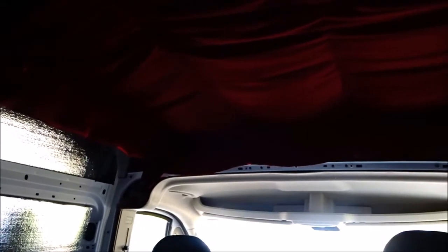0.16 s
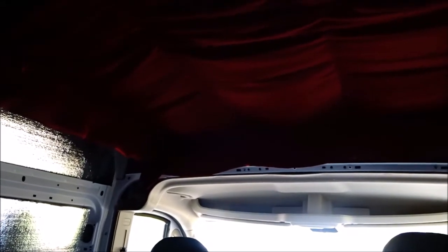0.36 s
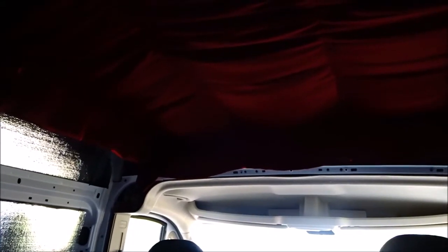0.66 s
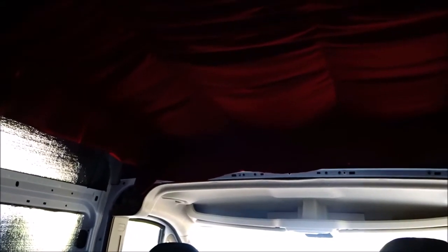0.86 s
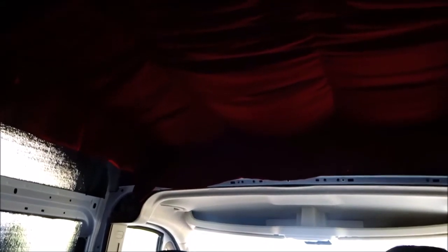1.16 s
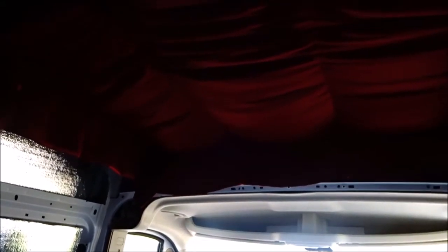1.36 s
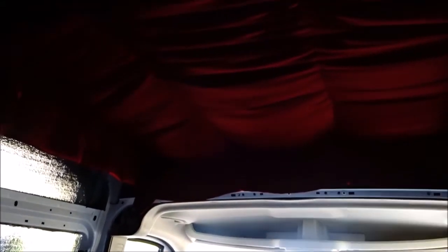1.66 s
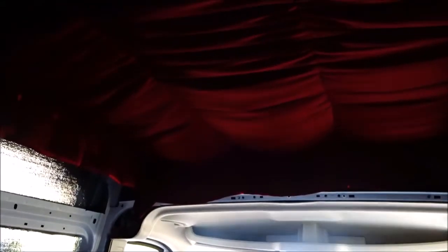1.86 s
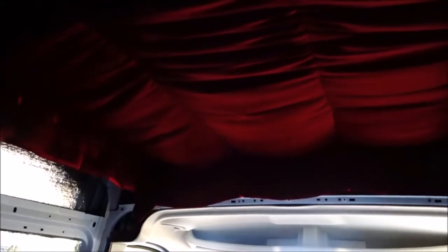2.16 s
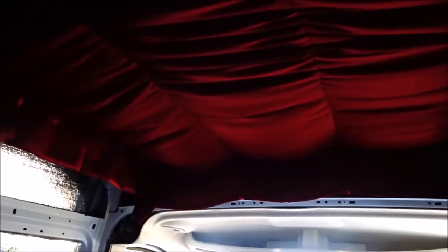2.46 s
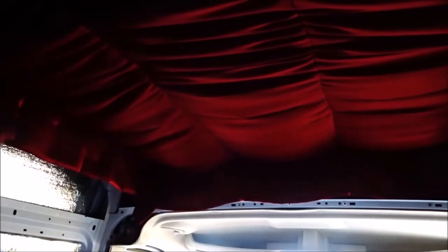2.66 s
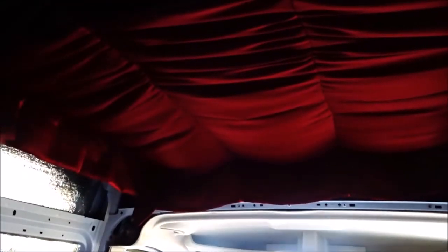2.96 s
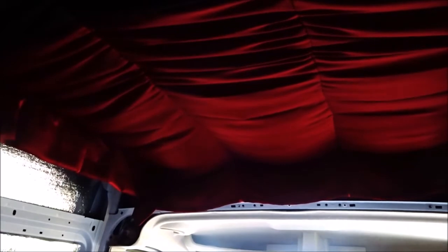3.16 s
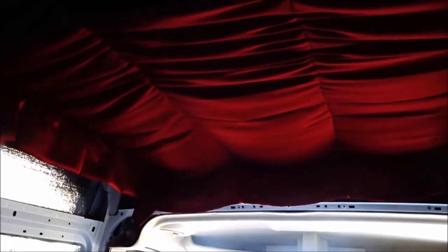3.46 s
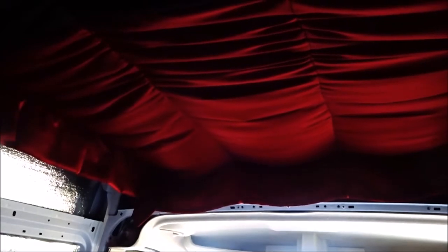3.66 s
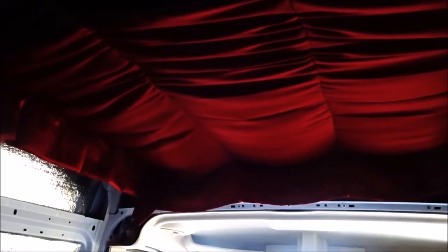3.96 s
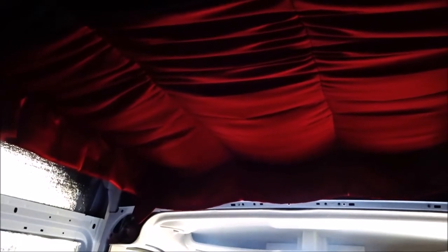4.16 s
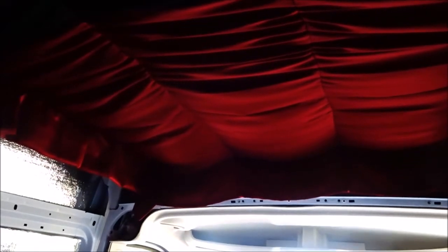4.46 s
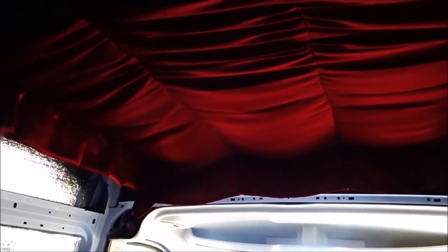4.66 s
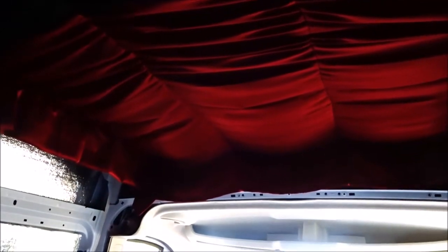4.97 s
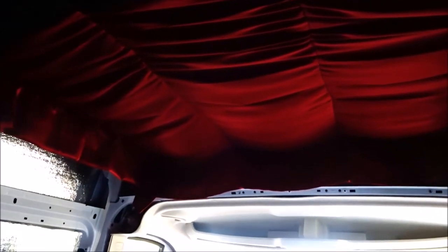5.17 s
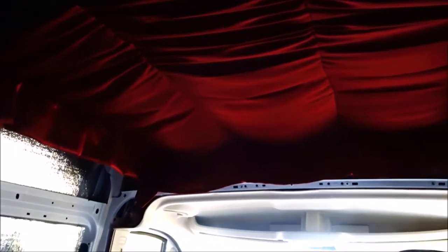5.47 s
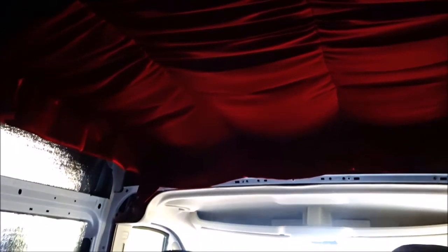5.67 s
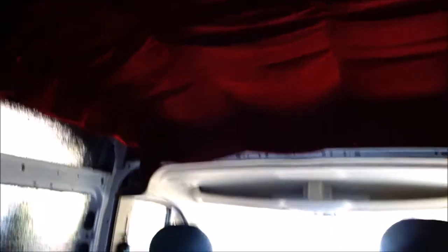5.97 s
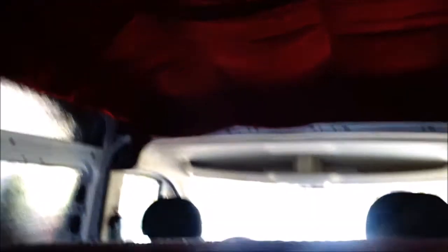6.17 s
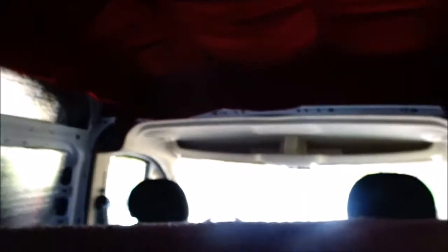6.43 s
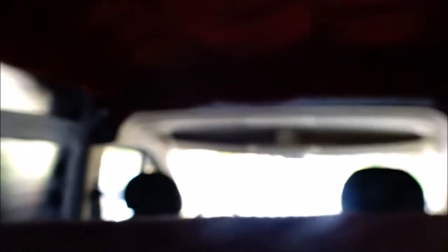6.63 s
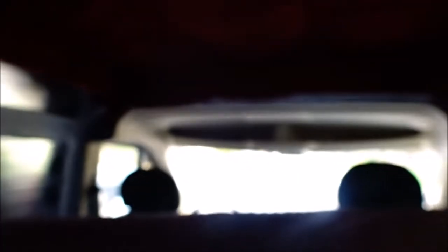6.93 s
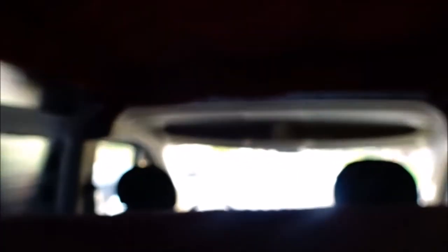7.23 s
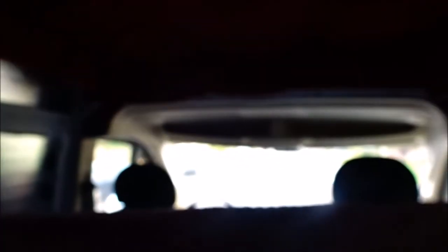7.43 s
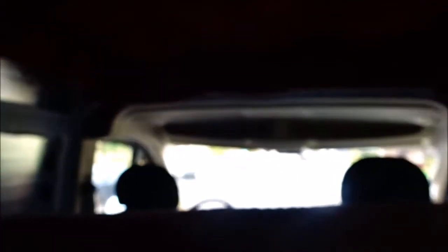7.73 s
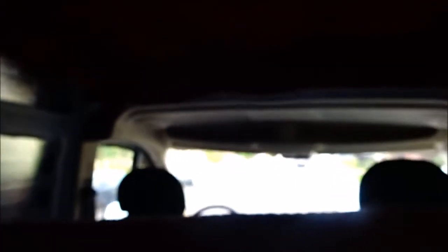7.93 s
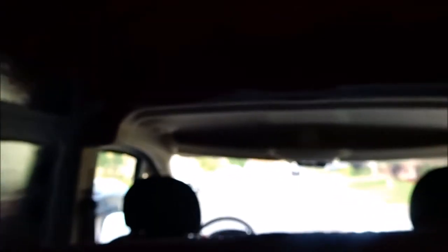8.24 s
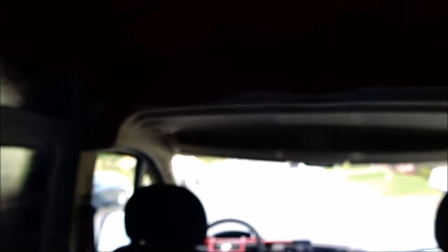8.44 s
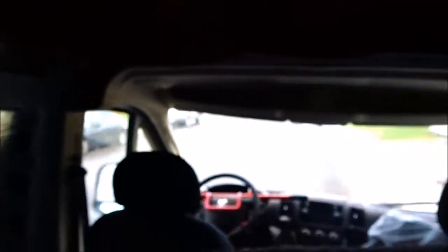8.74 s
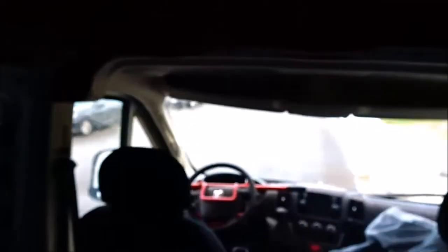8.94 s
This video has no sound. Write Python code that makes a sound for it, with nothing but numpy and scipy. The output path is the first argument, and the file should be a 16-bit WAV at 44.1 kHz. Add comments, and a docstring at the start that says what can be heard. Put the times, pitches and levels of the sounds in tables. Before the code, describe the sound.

From inside a parked van, raindrops tick and patter on the sheet-metal roof over an even hiss of finer rain.

```python
"""Rain on the sheet-metal roof of a parked van, heard from inside by a small two-port microphone.
Each big drop clicks and rings its panel, then its energy spreads through panel and cabin as a
diffuse wash that dies in about a quarter second. Close drops add sharp pitched ticks; countless
small ones merge into a hiss dotted with taps. Very faint low thumps lie far beneath the rain."""
import sys
import numpy as np
from scipy import signal
from scipy.fft import rfft, irfft, next_fast_len
from scipy.io import wavfile

SR = 44100
rng = np.random.default_rng(int(sys.argv[2]) if len(sys.argv) > 2 else 0)


def generate_wav(signal):
    """Clip the signal to [-1, 1] and save it as 16-bit WAV at the path in sys.argv[1]."""
    frames = np.transpose(np.atleast_2d(signal))
    scaled = np.clip(frames, -1, 1) * 32767
    pcm = np.round(scaled).astype(np.int16)
    wavfile.write(sys.argv[1], SR, pcm)


N = 401310
LEAD = SR // 4  # samples of pre-roll: the rain is already falling at the start

# Foreground hits: t/s, wash level/dB, boom/dB, splash/dB (low and high tone controls), panel note f/Hz
BIG_DROPS = [(0.0256, -28, -14, -15, 1080), (0.0394, -30.5, -9, -13, 847), (0.0524, -26.5, -10.5, -14, 697),
             (0.194, -29, -22, -14, 1170), (0.3018, -33, -9, -24, 925), (0.3202, -22.5, -12, -18, 963),
             (0.625, -35.5, -3.5, -32, 944), (0.7517, -31.5, -13, -17, 830), (0.8025, -29, -10, -18, 1064),
             (0.9744, -30.5, -11, -18, 1200), (1.112, -31, -13, -18, 940), (1.14, -48, -3, -26, 900),
             (1.2855, -32, -8, -18, 885), (1.328, -32.5, -15, -12, 920), (1.36, -28, -11, -17, 874),
             (1.3728, -23, -15.5, -8, 1010), (1.3846, -21.5, -11.5, -24, 1036), (1.401, -31, -10, -12, 904),
             (1.4434, -23.5, -13, -12, 880), (1.538, -35.5, -6, -8, 910),
             (1.5623, -27.5, -10.5, -10.5, 700), (1.7115, -30, -15, -8, 1004), (1.7234, -30, -16, -11, 813),
             (1.7684, -29, -8.5, -18, 777), (1.8326, -26.5, -12, -15, 680), (1.9355, -44, -18, -25, 865),
             (2.018, -32, -11, -12, 918), (2.0762, -26.5, -14.5, -10.5, 810),
             (2.1294, -29, -10.5, -17, 810), (2.145, -33, -12, -20, 900), (2.2245, -28.5, -12, -18, 940),
             (2.271, -31.5, -11, -11, 892), (2.3043, -30, -13, -7, 1040), (2.3184, -30, -12, -13, 760),
             (2.379, -30.5, -12, -11.5, 947), (2.42, -40, -1, -17, 900), (2.5528, -28.5, -7.5, -16, 820),
             (2.638, -32, -25, -17, 895), (2.7132, -25.5, -13.5, -10, 1290), (2.7374, -27, -15, -22, 810),
             (2.817, -31, -19, -18, 900), (2.8245, -29.5, -10, -17, 710), (3.0364, -37, -4, -9, 950),
             (3.1314, -24, -21, -16, 870), (3.1522, -26.5, -8, -18, 970), (3.212, -35, -21, -19, 920),
             (3.2297, -27.5, -20, -12, 1140), (3.316, -30.5, -15, -17, 900), (3.395, -39, -12, -18, 915),
             (3.4815, -29, -11.5, -20, 884), (3.5618, -28, -26, -14, 800), (3.5982, -29, -13, -15, 813),
             (3.641, -33.5, -7.5, -10, 923), (3.664, -33, -22, -16, 900), (3.6844, -27.5, -6, -10, 800),
             (3.6968, -30, -2.5, -12, 790), (3.7008, -24, -19, -12, 984), (3.845, -31.5, -14, -17, 924),
             (3.9193, -25.5, -10.5, -14.5, 872), (3.9632, -29, -8, -18, 955), (4.0044, -28, -6, -14, 697),
             (4.0234, -29.5, -5, -15, 773), (4.115, -26, -12, -15, 700), (4.122, -33, -4, -19, 900),
             (4.1288, -34.5, -3.5, -17, 937), (4.1644, -32.5, -1, -17, 781), (4.2108, -27, -9, -14, 794),
             (4.294, -31, -18, -14, 905), (4.3134, -34.5, -7, -9, 696), (4.3331, -25, -10, -21, 888),
             (4.4293, -34, -7.5, -16, 707), (4.4927, -26, -2.5, -17, 819), (4.5074, -29, -14, -18, 830),
             (4.5294, -28, -7, -10.5, 785), (4.5584, -27, -10, -17, 820), (4.6364, -32, -6, -15, 922),
             (4.6604, -32, -8, -12, 910), (4.6752, -27.5, -10, -15, 1170), (4.7814, -29, -23, -15, 796),
             (4.798, -31, -17, -13, 935), (4.8314, -29, -10, -12, 845), (4.8454, -26.5, -11.5, -11, 860),
             (4.9275, -31.5, -2.5, -12, 967), (5.0014, -31.5, -12, -17, 897), (5.081, -31, -23, -9.5, 1110),
             (5.214, -28.5, -14, -18, 1180), (5.228, -26.5, -13, -16, 974), (5.2685, -32, -16, -15, 980),
             (5.285, -30, -14, -15, 890), (5.3103, -33.5, -7.5, -13, 1004),
             (5.3468, -29.5, -9.5, -13, 1010), (5.397, -39, -6, -9, 900), (5.438, -32, -13, -8.5, 880),
             (5.4804, -28.5, -22, -13, 830), (5.525, -32.5, -9.5, -4, 1187), (5.5754, -27, -11.5, -12, 925),
             (5.61, -40, -8, -19, 920), (5.676, -31.5, -11.5, -16, 936), (5.712, -29, -16, -16, 910),
             (5.7773, -25.5, -9, -13, 811), (5.7904, -24, -17, -12, 814), (5.8531, -22, -13.5, -7.5, 787),
             (5.8658, -27, -7.5, -29, 967), (5.9895, -27.5, -12.5, -13, 805), (6.0764, -30, -7, -14, 950),
             (6.1016, -30.5, -26, -20, 910), (6.164, -30, -23, -10.5, 890), (6.1774, -29, -16, -15, 980),
             (6.3061, -32.5, -29, -13, 915), (6.3936, -20, -14, -13, 732), (6.525, -50, -12, -12, 910),
             (6.567, -28, -11, -11.5, 805), (6.612, -45, -21, -7, 900), (6.7146, -24, -12, -16.5, 668),
             (6.8483, -29.5, -14, -13, 712), (6.8833, -35, -6.5, -10, 1030), (6.9321, -32, -17, -15, 947),
             (7.018, -32, -10, -19, 1003), (7.065, -35, -9, -15, 907), (7.123, -36, -25, -14, 875),
             (7.19, -35, -11, -13, 920), (7.219, -24, -11.5, -18.5, 642), (7.2599, -31.5, -12, -16, 760),
             (7.305, -37, -11, -22, 908), (7.3781, -29.5, -11, -25, 748), (7.414, -33, -23, -14, 935),
             (7.4532, -32, -10, -11, 823), (7.459, -29.5, -7, -14, 807), (7.4694, -32.5, -20, -9, 860),
             (7.5457, -27.5, -11, -17, 658), (7.739, -33.5, -16, -15, 910), (7.7895, -27, -10, -18, 924),
             (7.824, -27.5, -16, -18, 945), (7.8684, -28.5, -20, -19, 780), (7.9423, -25.5, -8.5, -14, 796),
             (7.9724, -22.5, -14.5, -20, 798), (7.9904, -28.5, -8, -16, 670),
             (8.0551, -27.5, -15, -15, 775), (8.0815, -25.5, -18, -17, 674),
             (8.1339, -26, -15.5, -8.5, 964), (8.1738, -28.5, -9, -14, 748), (8.211, -37, -18, -7, 880),
             (8.2397, -25.5, -11.5, -14, 712), (8.3628, -25.5, -11.5, -15, 748),
             (8.3884, -29.5, -20, -20, 845), (8.4264, -35, -5, -3, 814), (8.4392, -26.5, -14, -17, 1010),
             (8.535, -35, -16, -21, 890), (8.6637, -30.5, -9.5, -21, 934), (8.756, -23.5, -14.5, -17, 950),
             (8.7874, -22.5, -19, -21, 880), (8.8084, -25.5, -10.5, -19, 837), (8.905, -37, -17, -27, 870),
             (8.989, -31, -15, -20, 1003), (9.0064, -29, -21, -16, 760), (9.0174, -23, -11.5, -15, 790)]
def contact_clicks(big):
    """The attack of each big drop: twelve pitches struck together, and one echo across the cabin."""
    hits = np.repeat(big, 12, axis=0)
    draw = rng.random((len(hits), 2))
    slot = np.arange(len(hits)) % 12
    hz = 800 * 13 ** ((slot + draw[:, 0]) / 12)
    tilt_db = 4 * np.log2(hz / 2000)  # brighter by 4 dB an octave
    db = drop_level_db(hz, hits) + curve(ROOF_EQ, hz) + 1 + tilt_db + 8 * (draw[:, 1] - .5)
    onset, t60 = hits[:, 0], 0.0036 + 6.3 / hz
    click = rings(onset, hz, db, t60, rise=0.00038, size=900)
    echo = rings(onset + 0.0135, hz, db - 7, 2 * t60, rise=0.0013, size=900)
    return low_cut(click + echo, 620, slope=6)


def panel_notes(big):
    """The body of each big drop: a cluster of close low panel modes and a few brief higher ones."""
    onset, low_hz, wash_db, boom_db = np.repeat(big[:, [0, 4, 1, 2]], 3, axis=0).T
    detune, uneven, pitch = rng.standard_normal((len(onset), 3)).T
    low_db = wash_db + boom_db - 6.5 + 3 * uneven
    low = rings(onset, low_hz * (1 + 0.04 * detune), low_db, t60=0.14, rise=0.0037, size=4000)
    high_hz = 2600 * 2.8 ** np.tanh(pitch)
    high_db = wash_db + curve(ROOF_EQ, high_hz) - 4.5
    high = rings(onset, high_hz, high_db, t60=0.038, rise=0.00079, size=2500)
    return low_cut(low + high, 560, slope=6)  # the notes carry no bass


# Tone of roof, lining and microphone together: f/Hz, relative level/dB
ROOF_EQ = [(15, -78), (25, -24), (158, -37), (220, -34.5), (299, -23.5), (511, -15), (690, -8), (811, -7.5),
           (980, -7.5), (1130, -11), (1840, -8), (2200, -9.5), (3500, -12.5), (4300, -13), (4900, -19),
           (5500, -18.5), (6000, -21), (6600, -20.5), (7300, -25.5), (8000, -26), (8700, -25), (10000, -26),
           (12000, -29.5)]
# Envelope of the wash across the spectrum: f/Hz, t60/s, build-up/s, early burst level/dB
WASH_ENVELOPE = [(150, 0.092, 0.025, -13), (400, 0.15, 0.016, -3), (700, 0.28, 0.02, -9),
                 (1930, 0.2, 0.0074, -16), (4640, 0.14, 0.0065, 0), (9800, 0.18, 0.002, -3.5)]
# Stereo image of the wash: f/Hz, left-right correlation (1 is mono)
WASH_IMAGE = [(60, 0.95), (130, 0.89), (270, 0.85), (560, 0.96), (1190, 0.84), (2520, 0.76), (5320, 0.041),
              (11200, -0.34)]
def roof_wash(drops, scatter_db):
    """The tail: drops feed the dense modes of panel and cabin; each band swells and dies at its pace."""
    bands_hz = 200 * 2 ** (np.arange(15) * 2 / 5)
    size = next_fast_len(N)
    hz = np.fft.rfftfreq(size, 1 / SR)
    noise = rfft(rng.standard_normal((2, size))) * amp(curve(ROOF_EQ, hz))
    uneven_db = scatter_db[:, None] * rng.standard_normal((len(drops), len(bands_hz)))
    arrival = ((drops[:, 0] + 0.0004) * SR + LEAD).astype(int)  # just after the contact
    wash = np.zeros((2, N))
    for k, centre in enumerate(bands_hz):
        t60, build_up, early_db = (curve(WASH_ENVELOPE, centre, column) for column in (1, 2, 3))
        power = amp(2 * (drop_level_db(centre, drops) + uneven_db[:, k] / 2))
        blows = np.bincount(arrival, power, N + LEAD)
        pole = np.exp(-1 / (SR * build_up))
        tail = signal.lfilter([1 - pole], [1, -pole], decay(blows, t60))
        early = amp(early_db) ** 2 * decay(blows, t60=0.041)  # before the energy has spread
        crack = amp(-7) ** 2 * decay(blows, t60=0.007)  # the drop bursting
        envelope = np.sqrt((tail + early + crack)[LEAD:N + LEAD])
        crossfade = curve(np.c_[bands_hz, bands_hz == centre], hz)
        wash += envelope * irfft(noise * crossfade, size)[:, :N]
    width = lambda f: np.arccos(curve(WASH_IMAGE, f)) / 2
    mid, side = filtered(amp(7) * wash, lambda f: np.array([np.cos(width(f)), np.sin(width(f))]))
    return np.array([mid + side, mid - side])


# Bright accents from drops landing close by: t/s, centre f/Hz, level/dB
CLOSE_TICKS = [(0.3225, 4050, -28), (2.0755, 4730, -36), (3.143, 1900, -28), (3.6855, 4200, -26),
               (4.1152, 9200, -33.5), (4.211, 2580, -26), (5.7775, 4140, -38), (6.5682, 3140, -28),
               (7.4145, 4000, -36), (7.4535, 3020, -30), (7.55, 1580, -23), (8.1375, 5460, -30),
               (8.364, 4240, -26), (8.442, 4320, -42), (0.8586, 4280, -29.5), (1.2861, 1850, -25),
               (1.2865, 3590, -30), (1.3749, 4140, -24), (1.4028, 5770, -26), (1.7685, 2220, -24),
               (1.8328, 3100, -23), (2.553, 1930, -27), (2.7135, 8460, -29.5), (2.88, 6050, -32),
               (3.1527, 5930, -29), (3.158, 1150, -25.5), (3.7011, 4180, -20), (3.563, 3800, -35),
               (3.922, 2360, -35), (4.4945, 4200, -25), (5.082, 6250, -30), (5.1647, 4070, -28),
               (5.348, 1740, -25), (5.4815, 5540, -28), (5.5264, 8140, -32), (5.791, 5670, -20.5),
               (5.8537, 6250, -25), (6.0776, 5050, -27), (6.307, 1880, -27), (6.3938, 6370, -23),
               (6.726, 1750, -31), (6.8494, 4200, -26), (6.884, 2940, -26), (7.2605, 2200, -26),
               (7.7914, 2550, -24), (7.877, 3830, -29), (7.9434, 6720, -34), (8.1755, 4300, -24.5),
               (8.3685, 4400, -28), (8.52, 4000, -30), (8.606, 4060, -33), (8.7565, 2050, -25),
               (9.0185, 3240, -24), (9.019, 9400, -30)]
def close_ticks():
    """Direct sound: the metal under a drop snaps on seven scattered pitches, then shimmers out."""
    onset, hz, db = np.repeat(CLOSE_TICKS, 7, axis=0).T
    draw = rng.random((len(onset), 4))
    snap_hz = hz * (1 + 0.33 * (draw[:, 1] - .5))
    snap = rings(onset + 0.0012 * draw[:, 0], snap_hz, db - 7, t60=0.0079, rise=0.00058, size=800)
    shimmer_hz = hz * (1 + 0.299 * (draw[:, 3] - .5))
    shimmer = rings(onset + 0.012 * draw[:, 2], shimmer_hz, db - 13.5, t60=0.027, rise=0.002, size=2000)
    return snap + shimmer


# Level ride of the rain bed: t/s, wash level of the faintest drops/dB
SHOWER_RIDE = [(0.0, -45), (1.11, -47.5), (1.98, -44), (2.3, -46), (2.5, -46.5), (2.69, -49), (2.9, -45.5),
               (3.3, -45.5), (3.88, -48.5), (4.38, -43.5), (5.0, -45.5), (5.5, -47), (6.11, -44.5),
               (6.51, -48.5), (6.69, -49.5), (7.0, -47), (7.65, -46.5), (8.24, -46), (8.51, -47),
               (9.1, -48)]
def small_drops():
    """Random hits in the columns of BIG_DROPS, about 330 a second: most faint, a few stronger."""
    draw = rng.random((3100, 5))
    onset = (draw[:, 0] * (N + LEAD) - LEAD) / SR
    wash_db = np.interp(onset, *np.transpose(SHOWER_RIDE)) - 2.5 * np.log(draw[:, 1]).clip(-3.5)
    boom_db = -11 + 6 * (draw[:, 2] - .5)
    splash_db = -15 + 6 * (draw[:, 3] - .5)
    return np.array([onset, wash_db, boom_db, splash_db, 620 * 1.8 ** draw[:, 4]]).T


def small_taps(small):
    """One small drop in four rings a single roof mode long enough to be heard as a tap."""
    onset, wash_db = small[::4, :2].T
    pitch, strength = rng.random((len(onset), 2)).T
    hz = 750 * 13 ** pitch
    db = wash_db + curve(ROOF_EQ, hz) + 2.5 - 3 * np.log(strength).clip(-3)
    return rings(onset, hz, db, t60=0.099 * (1000 / hz) ** 0.48, rise=0.0012, size=2600)


def faint_ticks(small):
    """Fine grain: the metal under each small drop rings for a moment at a random high pitch."""
    hz = 1500 * 6.64 ** rng.random(len(small))
    db = small[:, 1] + curve(ROOF_EQ, hz) + rng.normal(9.0, 3.4, len(small))
    return rings(small[:, 0], hz, db, t60=25 / hz, rise=0.00059, size=500)


# Low-end accents far beneath the rain: t/s, level/dB
LOW_THUMPS = [(0.8, -80), (1.28, -82), (2.07, -85), (2.555, -81), (2.685, -81), (4.2, -64), (4.495, -77),
              (5.345, -78), (5.775, -83), (5.86, -72), (6.375, -72), (6.562, -82), (6.7, -80), (7.45, -71),
              (7.942, -67), (8.062, -69), (8.355, -79), (9.005, -74)]
def low_thumps():
    """Very faint, short low thumps near 70 Hz; fifty still fainter ones come at random."""
    onset, db = np.transpose(LOW_THUMPS)
    draw = rng.random((50, 2))
    onset = np.r_[onset, draw[:, 0] * N / SR]
    db = np.r_[db, -94 + 8 * draw[:, 1]]
    hz = 70.5 * 1.6 ** (rng.random(len(onset)) - .5)
    pan = amp([[-0.8], [0.8]])  # slightly right
    return pan * rings(onset, hz, db, t60=0.086, rise=0.0028, size=4000)


def drop_level_db(hz, drops):
    """Each drop's level at hz: a boom of -10.5 dB and a splash of -16 dB leave its tone flat."""
    low = np.clip(np.log2(1700 / hz) / 1.2, 0, 1)
    high = np.clip(np.log2(hz / 3500) / 1.24, 0, 1)
    return drops[:, 1] + low * (drops[:, 2] + 10.5) + high * (drops[:, 3] + 16)


def rings(onset, hz, db, t60, rise, size):
    """Damped sines, size samples long, that reach the two ports a moment apart; times in seconds."""
    onset, hz, db, t60 = (np.reshape(c, (-1, 1)) for c in (onset, hz, db, t60))
    lag = 7e-5 * (rng.random(onset.shape) - .5)
    where = ((onset * SR).astype(int) + np.arange(size)).ravel()
    ports = []
    for port in (1, -1):
        t = (np.arange(size) / SR - 1e-4 + port * lag).clip(0)
        envelope = amp(db - 60 * t / t60) * (1 - np.exp(-t / rise))
        ring = envelope * np.sin(2 * np.pi * hz * t)
        ports.append(np.bincount(where, ring.ravel(), N + size)[:N])
    return np.array(ports)


def decay(energy, t60):
    """Gives energy impulses an exponential tail."""
    return signal.lfilter([1], [1, -amp(-120 / (SR * t60))], energy)


def amp(db):
    """Decibels to gain."""
    return 10 ** (np.asarray(db) / 20)


def curve(table, hz, column=1):
    """One column of a table read on a log-frequency axis."""
    columns = np.transpose(table)
    return np.interp(np.log(hz + 1), np.log(columns[0] + 1), columns[column])


def filtered(x, response):
    """Zero-phase EQ with gain response(hz)."""
    size = next_fast_len(N + 8192)
    return irfft(rfft(x, size) * response(np.fft.rfftfreq(size, 1 / SR)), size)[..., :N]


def low_cut(x, corner_hz, slope):
    """High-pass, with slope in steps of 6 dB an octave."""
    return filtered(x, lambda hz: hz ** slope / (hz ** slope + corner_hz ** slope))


def scene():
    """The mix: big and small drops share one roof; the left port hears a little more treble."""
    big, small = np.array(BIG_DROPS), small_drops()
    heard = small[small[:, 0] > 0]
    scatter_db = np.repeat([6, 2.5], [len(small), len(big)])  # small drops excite the bands less evenly
    rain = roof_wash(np.vstack([small, big]), scatter_db)
    rain += faint_ticks(heard) + close_ticks() + small_taps(heard)
    rain += panel_notes(big) + contact_clicks(big)
    rain = low_cut(rain, 160, slope=4)  # the rain carries no deep bass
    lean_db = lambda hz: np.outer([1, -1], curve([(2000, 0.086), (8000, .5)], hz))
    return filtered(rain, lambda hz: amp(lean_db(hz))) + low_thumps()


def record(dry):
    """A brick-wall high cut near 11 kHz."""
    return filtered(dry, lambda hz: 1 / (1 + (hz / 11060) ** 300))


dry = scene()
out = record(dry)
generate_wav(out)
```